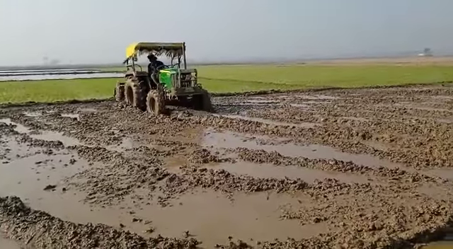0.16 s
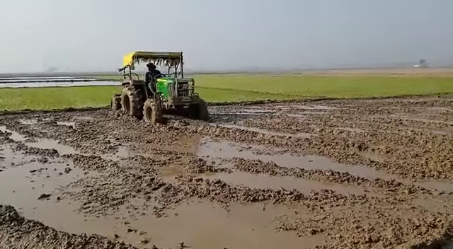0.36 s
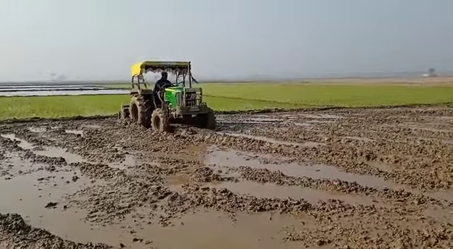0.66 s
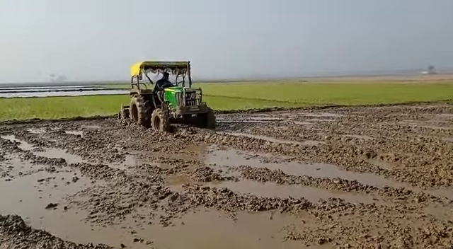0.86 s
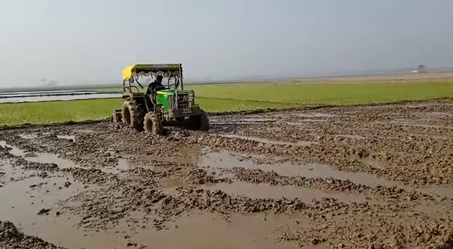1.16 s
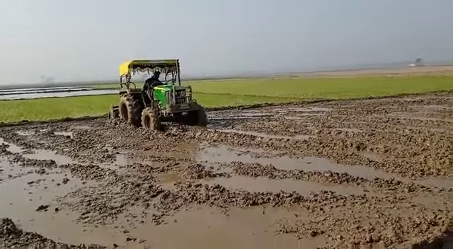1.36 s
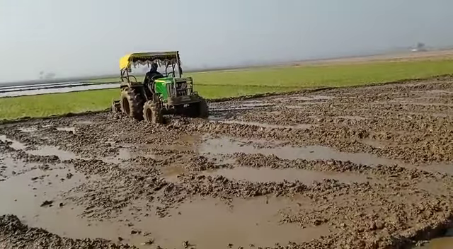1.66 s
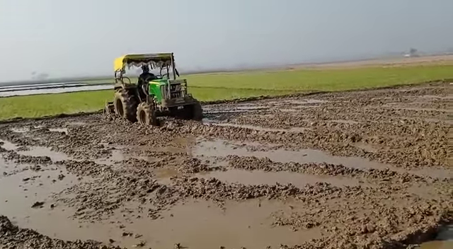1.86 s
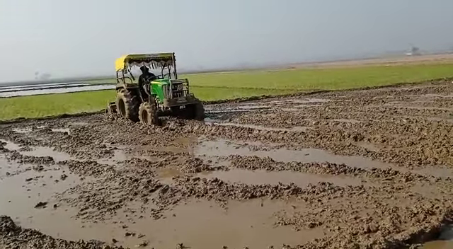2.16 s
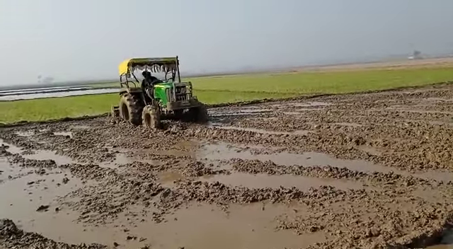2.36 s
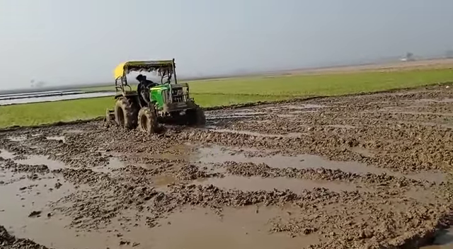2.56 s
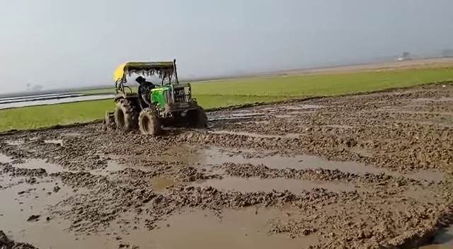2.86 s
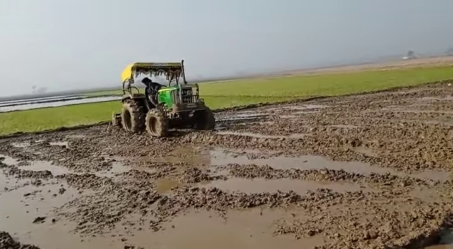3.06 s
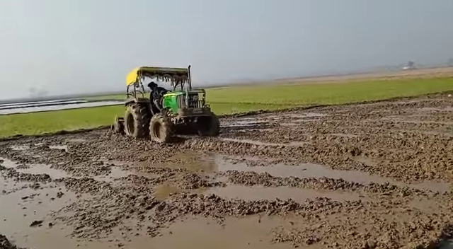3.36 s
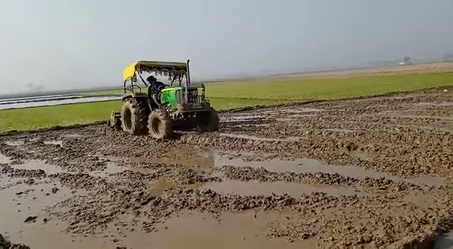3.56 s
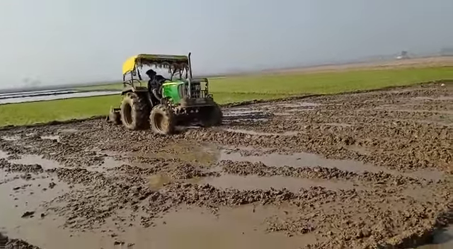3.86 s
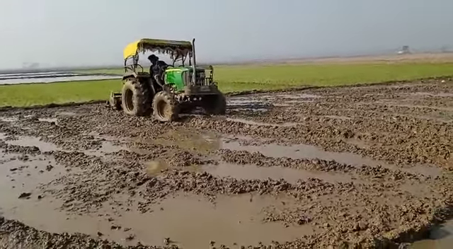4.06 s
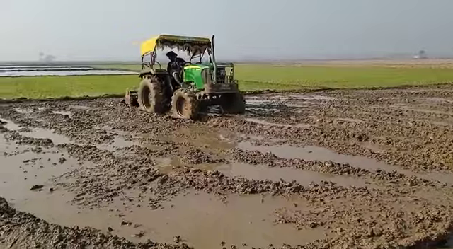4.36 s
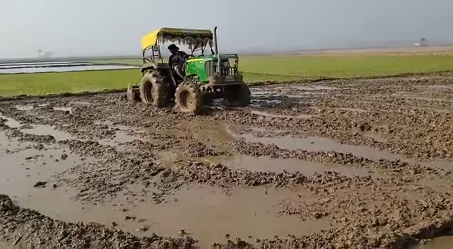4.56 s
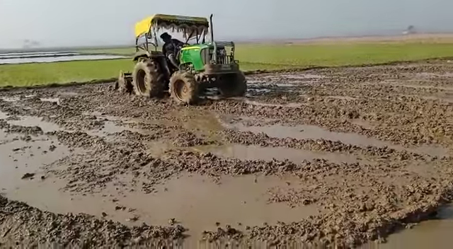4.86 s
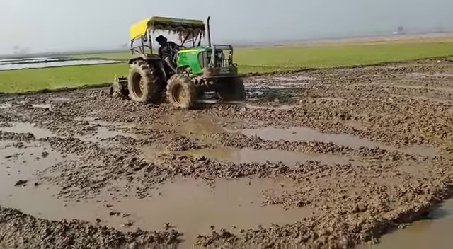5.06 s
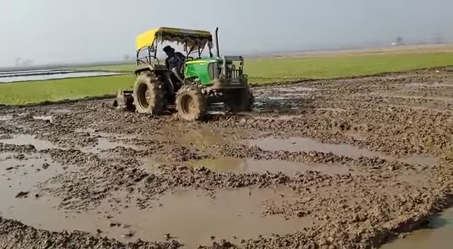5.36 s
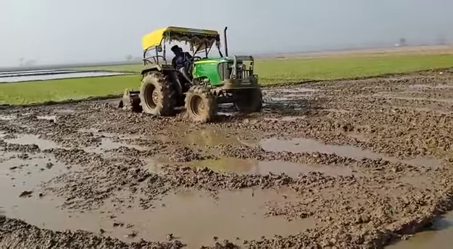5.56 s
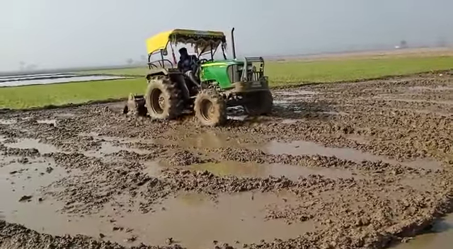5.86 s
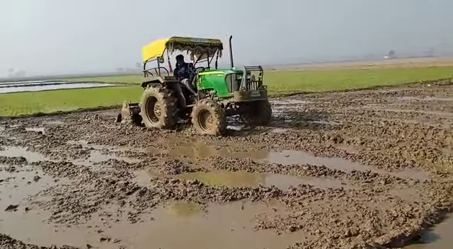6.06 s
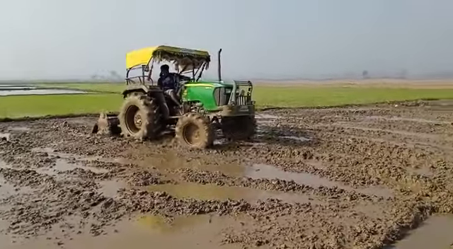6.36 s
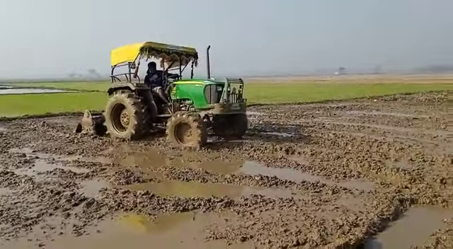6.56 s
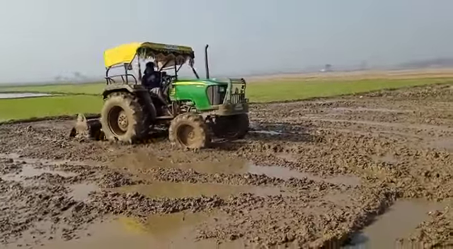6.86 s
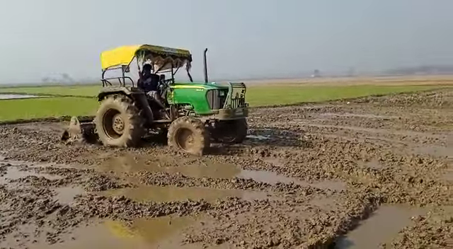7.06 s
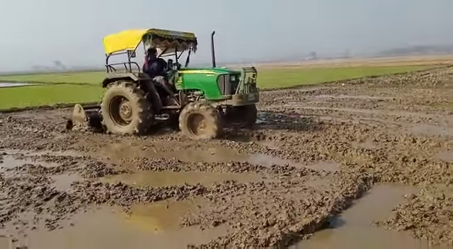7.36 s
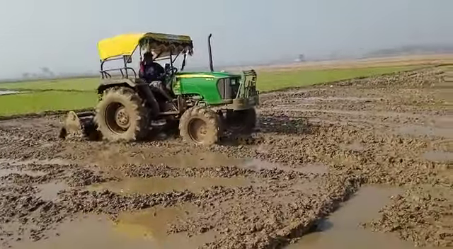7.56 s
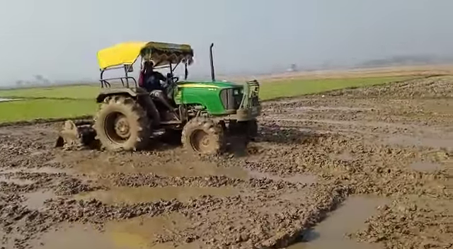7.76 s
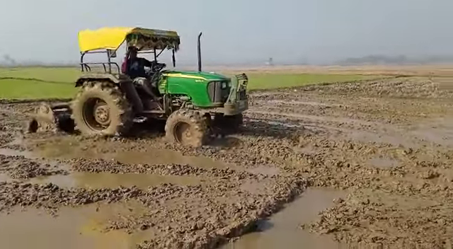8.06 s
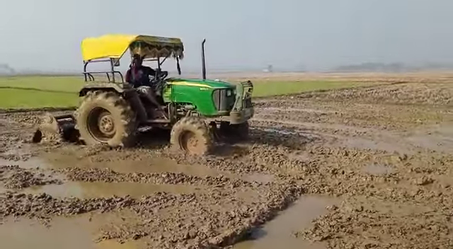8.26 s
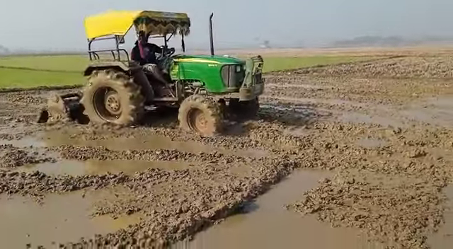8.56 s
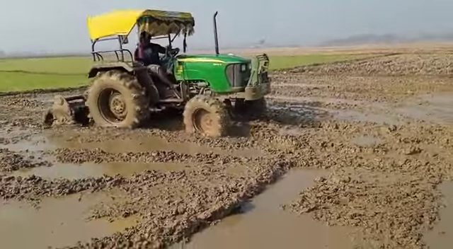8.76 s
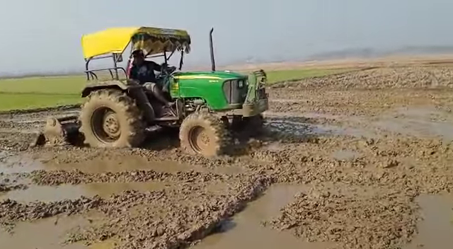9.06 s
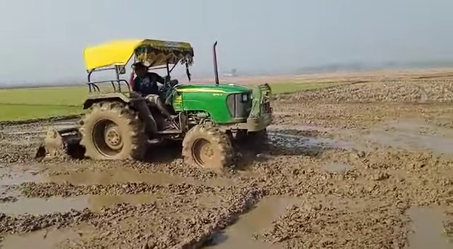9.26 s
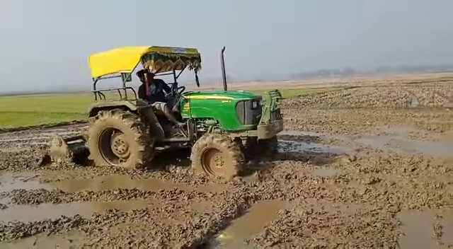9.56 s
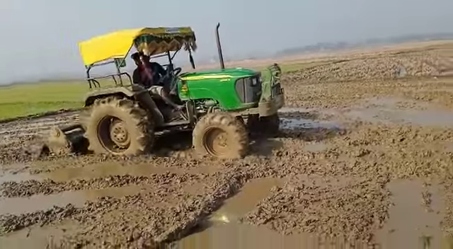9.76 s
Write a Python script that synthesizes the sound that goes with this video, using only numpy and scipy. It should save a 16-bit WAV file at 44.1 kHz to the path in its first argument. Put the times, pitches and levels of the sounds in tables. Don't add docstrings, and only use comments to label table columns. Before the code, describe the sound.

Low exhaust puffs and rattling metal from a three-cylinder tractor, mono and outdoors with no room echo, only a slight hollow colouring from the wet ground. Light running first, a short muddy scrape, then a surge of load drops the revs and brings ringing knocks. After several seconds of labouring it speeds up again and continues steadily, nearer to the phone, over faint low mud churn.

```python
import sys
import numpy as np
from scipy import signal
from scipy.fft import rfft, irfft, next_fast_len
from scipy.io import wavfile
from scipy.ndimage import uniform_filter1d, map_coordinates

SR = 44100
rng = np.random.default_rng(int(sys.argv[2]) if len(sys.argv) > 2 else 0)


def gain_from_decibels(decibels):
    exponent = np.asarray(decibels, float) / 20
    return 10 ** exponent


def materialize(psi):
    bounded = np.clip(np.atleast_2d(psi).T, -1, 1)
    quanta = np.round(bounded * 32767).astype(np.int16)
    wavfile.write(sys.argv[1], SR, quanta)


N = 437472

# (time [s], firing rate [1/s])
FIRING_RATE = [(0.0, 38.5), (1.3, 38.93), (1.45, 37.39), (2.2, 38.34), (2.4, 34.43), (2.8, 29.92),
               (3.65, 28.96), (4.05, 29.6), (4.5, 31.79), (4.9, 29.84), (5.0, 29.77), (5.8, 33.41),
               (6.3, 37.34), (6.75, 36.51), (7.0, 37.44), (7.35, 36.4), (8.0, 36.73), (9.92, 36.77)]
# (time [s], throttle as exhaust level [dB], knock [0-1])
EFFORT = [(0, -38.5, 0.24), (.25, -46.5, 0.04), (.7, -44.5, 0.18), (1.32, -47.5, .2), (1.44, -40.5, 0.17),
          (1.62, -34, 0.42), (1.8, -37.5, 0.15), (2.33, -40, 0), (2.42, -34, 0.78), (2.7, -39, 0.93),
          (3.4, -42.5, 0.67), (4.3, -39.5, 0.75), (4.95, -42.5, 0.62), (5.9, -37, 0.74), (6.4, -38, 0.33),
          (7.7, -38.5, 0.33), (8.9, -39.5, 0.22), (9.92, -36.5, 0.48)]
KNOCK_AT, PUFF_AT, TICK_AT = .62, .44, .28
# (level at usual throttle and 10 m [dB], [dB per throttle dB], [dB per nearness dB], at full knock [dB])
CASING_PART = (-44, 0.41, 1.0443, 3)
BLOCK_PART = (-38, 0.37, 0.66, 1)


def unit(x):
    return x / np.sqrt(np.mean(x ** 2) + 1e-20)


def steady(x, seconds=.4):
    return x / np.sqrt(np.abs(uniform_filter1d(x ** 2, int(seconds * SR))) + 1e-12)


def curves(rows):
    s, *cols = np.transpose(rows)
    return [np.interp(np.arange(N) / SR, s, c) for c in cols]


def wobble(rate):
    coarse = np.arange(0, N + 64, 64)
    knots = rng.standard_normal(int(N * rate / SR) + 4)
    return np.interp(np.arange(N), coarse, map_coordinates(knots, [coarse * rate / SR]))


def colour(x, points, peaks=(), size=16384):
    hz = np.fft.rfftfreq(size, 1 / SR)
    f, v = np.transpose(points)
    level_db = np.interp(np.log(hz + 1), np.log(f + 1), np.maximum(v, -100))
    level_db = level_db + sum(db / (1 + (2 * (hz - c) / w) ** 2) for c, w, db in peaks)
    cepstrum = irfft(np.log(gain_from_decibels(level_db)))
    cepstrum[1:size // 2] *= 2
    cepstrum[size // 2 + 1:] = 0
    return signal.fftconvolve(x, irfft(np.exp(rfft(cepstrum))))[:N]


def levels(part):
    # (time [s], distance [m])
    approach = [(0, 23), (2.3, 20.5), (5, 14.4), (6.1, 12), (8, 8.76), (9.92, 8.65)]
    usual_throttle_db, usual_m = -40, 10
    throttle_db, knock = curves(EFFORT)
    near_db = 20 * np.log10(usual_m / curves(approach)[0])
    level_db, per_throttle, per_near, knock_db = part
    return level_db + per_throttle * (throttle_db - usual_throttle_db) + per_near * near_db + knock_db * knock


def firings(at, column, scatter_db, jitter_ms=0):
    # (knock [dB], exhaust [dB], lateness [ms])
    cylinders = [(-1.5, 3, 0.029), (0, 4, 0.33), (-2, 2.5, -.2)]
    turns = np.cumsum(curves(FIRING_RATE)[0]) / SR - at
    when = np.flatnonzero(np.diff(np.floor(turns)) > 0)
    cylinder = np.array(cylinders)[np.floor(turns[when + 1]).astype(int) % len(cylinders)]
    size, jitter = rng.standard_normal((N // 1000, 2))[:len(when)].T
    late = ((cylinder[:, 2] + jitter_ms * jitter) * SR / 1000).astype(int)
    train = np.zeros(N)
    train[np.clip(when + late, 0, N - 1)] = gain_from_decibels(cylinder[:, column] + scatter_db * size)
    return train


def bursts(train, rise, fall, echo, lag):
    t = np.arange(SR // 20) / SR

    def blow(u):
        return np.maximum(u, 0) / rise * np.exp(-np.maximum(u, 0) / rise)

    tail = 0.31 * np.exp(-t / fall) * (t > rise)
    return unit(signal.fftconvolve(train, blow(t) + echo * blow(t - lag) + tail)[:N])


def ground(x, strength):
    # (time [s], extra delay [ms])
    mirror_path = [(0, 1.31), (4, 1.3), (6, 1.297), (7.6, 1.39), (8.2, 1.28), (9.92, 1.3)]
    late = np.arange(N) - curves(mirror_path)[0] * SR / 1000
    return x + strength * map_coordinates(uniform_filter1d(x, size=6), [late], order=1)


def rings(rows, rise, rough, size=1400):
    s, db, hz, t60 = np.transpose(rows)[:, :, None]
    t = np.arange(size) / SR
    grain = rng.standard_normal((len(s), size))
    ragged = 1 + rough * unit(uniform_filter1d(uniform_filter1d(grain, size=30), size=24))
    envelope = gain_from_decibels(db - 60 * t / t60) * (1 - np.exp(-t / rise)) ** 2 * ragged
    waves = envelope * np.sin(2 * np.pi * hz * t)
    at = np.maximum(np.round(s * SR), 0).astype(int) + np.arange(size)
    return np.bincount(at.ravel(), waves.ravel(), N + size)[:N]


def exhaust():
    # (frequency [Hz], gain [dB])
    pipe = [(25, -82), (40, -76), (58, -11), (73, 0), (110, 1.5), (150, 2), (185, -4.5), (220, -14),
            (300, -25.5), (500, -29), (1000, -52), (4000, -100)]
    # (frequency [Hz], density [dB per Hz])
    mud = [(32, -27), (55, -13.5), (86, -16), (162, -1.5), (199, -5.5), (238, -12), (420, -19),
           (550, -44.5), (920, -120)]
    # (frequency [Hz], density [dB per Hz])
    cab = [(150, -63), (169, -8.5), (178, -4.5), (187, -6.5), (212, -62)]
    boom_part, cab_part, fifth_part = (0, -0.4, 1, 9), (-4.5, -0.4, 1.7, -5), (-5, -0.73, -1, -0.5)
    pipe_ms_per_hz, pipe_mid_hz = 0.203, 111.1
    throttle_db = curves(EFFORT)[0]

    puffs = steady(colour(firings(PUFF_AT, column=1, scatter_db=1.3, jitter_ms=0.18), pipe))
    hz = np.minimum(np.fft.rfftfreq(N, 1 / SR), 240) - pipe_mid_hz
    puffs = irfft(rfft(puffs) * np.exp(-1j * np.pi * pipe_ms_per_hz / 1000 * hz ** 2), N)

    def order(band_hz):
        return signal.sosfiltfilt(signal.butter(2, band_hz, "bandpass", fs=SR, output="sos"), puffs)

    deep = signal.filtfilt(*signal.butter(2, 105, fs=SR), puffs)
    fourth, fifth = order((134, 173)), order((169, 217))
    idle_dip = 0.52 * np.clip((-42 - throttle_db) / 2, 0, 1)
    sung = (gain_from_decibels(levels(fifth_part)) - 1) * fifth
    boomed = (gain_from_decibels(levels(boom_part)) - 1) * deep
    puffs = puffs + sung + boomed - idle_dip * fourth

    churn = unit(colour(rng.standard_normal(N), mud)) * gain_from_decibels(1.0 * wobble(2.0) + 3.4 * wobble(12))
    drone = unit(colour(rng.standard_normal(N), cab)) * gain_from_decibels(levels(cab_part) + 1.4 * wobble(9.1))
    mounts = gain_from_decibels(-71) * np.sin(2 * np.pi * np.cumsum(curves(FIRING_RATE)[0]) / SR)
    return gain_from_decibels(throttle_db + 0.41 * wobble(5)) * (0.93 * puffs + 0.27 * churn + drone) + mounts


def block():
    # (frequency [Hz], density [dB per Hz])
    casing = [(140, -31.5), (230, 2), (408, 0.5), (817, -3.5), (1120, -2), (1700, -11), (1880, -3),
              (2100, -8), (2730, -39.5), (4620, -120)]
    metal = [(1000, -42), (1700, -7.5), (1890, -13.5), (2120, -6), (2460, -4.5), (2860, 1.5), (4050, -5),
             (4510, -3), (5080, -12), (5800, -16.5), (7540, -44), (12800, -120)]
    hiss = [(2820, -33), (4800, 0), (5090, -3.5), (7020, -10), (8490, -21.5), (9790, -21.5), (11500, -33.5),
            (15000, -53), (22000, -120)]
    air = [(4820, -31), (8200, -5.5), (9960, -2), (11400, -5.5), (12100, -9), (12700, -15), (13700, -16),
           (15100, 3.5), (15800, -2)]
    # (frequency [Hz], width [Hz], height [dB])
    panels = [(350, 62, 7), (770, 67, 1.5), (1277, 160, 4.5), (2150, 72, 2.5), (2910, 40, 4),
              (3600, 270, 7), (4165, 140, 7), (4310, 47, 6.5)]
    hiss_part, fan_part = (-50.5, 0.22, 1.41, 5.5), (-63, 0.2, 1, 3)
    strain = np.clip(0.89 * curves(EFFORT)[1], 0, 1)
    knocks = firings(KNOCK_AT, column=0, scatter_db=1.84)
    valve_train = firings(TICK_AT, column=1, scatter_db=5)
    ticks = bursts(valve_train, rise=0.00038, fall=0.0076, echo=0.13, lag=0.0028)

    def layer(spectrum, part, bite, tick, rise, fall):
        share = np.clip(strain * bite, 0, .97)
        gate = np.sqrt(share) * bursts(knocks, rise, fall, echo=0.75, lag=0.0056)
        gate = gate + tick * (1 - strain) * ticks
        noise = rng.standard_normal((2, N))
        rattle = gain_from_decibels(1.17 * wobble(25) + 1.7 * wobble(70))
        mixed = gate * noise[0] + np.sqrt(1 - share) * rattle * noise[1]
        return gain_from_decibels(levels(part)) * steady(ground(colour(mixed, spectrum, panels), strength=.55))

    return (layer(casing, CASING_PART, bite=0.63, tick=0.13, rise=0.0016, fall=0.039)
            + layer(metal, BLOCK_PART, bite=0.57, tick=0.1, rise=0.0016, fall=0.022)
            + layer(hiss, hiss_part, bite=1.11, tick=0.23, rise=0.0025, fall=0.0062)
            + layer(air, fan_part, bite=0.86, tick=0.14, rise=0.0018, fall=0.008))


def pings():
    # (pitch ratio, level [dB], delay [ms])
    head_modes = [(1, 5.5, 0), (.85, 2, 4.5), (.7, -1.5, 5), (1.14, -1.5, 1.5), (1.3, -15.5, 1.5),
                  (2, -19.5, 1.5)]
    # (time [s], peak level [dB], ring frequency [Hz])
    hard_knocks = [(2.484, -22, 3660), (2.5766, -19, 4090), (2.6075, -24, 4180), (2.702, -28, 3600),
                   (2.7355, -27, 4280), (2.7669, -23.5, 3490), (2.8357, -25, 4150), (2.8682, -27, 3570),
                   (3.0694, -18, 4120), (3.171, -18, 4030), (3.2398, -24, 4060), (3.2743, -24, 4080),
                   (3.3411, -22, 4020), (3.443, -19.5, 4060), (3.547, -27.5, 4100), (3.5825, -21.5, 4000),
                   (3.721, -26, 3850), (3.7547, -24.5, 4000), (3.8906, -19.5, 4420), (4.5786, -26, 4330),
                   (5.1717, -22, 4260), (5.364, -24, 4030), (5.4907, -25, 3500), (5.5231, -25, 3560),
                   (5.6154, -23.5, 4010), (5.7062, -28, 4470), (5.8284, -26, 4070), (5.9167, -23, 3800),
                   (6.142, -25, 3350), (6.8193, -21.5, 4130)]
    head_part, sump_part = (-7.5, 0.02, -0.15, 16), (-9.5, .6, -.5, 17.5)
    head_t60, sump_t60, hard_t60 = .022, .02, .032
    casing_db, block_db, head_db, sump_db = map(levels, (CASING_PART, BLOCK_PART, head_part, sump_part))
    head_hz = 3653 + 537 * curves(EFFORT)[1]
    blows = firings(KNOCK_AT, column=0, scatter_db=0.5)
    at = np.flatnonzero(blows)
    s, db = at / SR, 20 * np.log10(blows[at])

    def luck():
        return rng.standard_normal(N // 1000)[:len(at)]

    struck = []
    for ratio, level_db, ms in head_modes:
        start = s + (ms + .8 * luck()) / 1000
        ring_db = db + block_db[at] + head_db[at] + 6 + level_db + 1.8 * luck()
        ring_hz = ratio * head_hz[at] * (1 + .045 * luck())
        struck.append(np.c_[start, ring_db, ring_hz, 0 * s + head_t60])

    thud_db = db + casing_db[at] + sump_db[at] + 11 + 1.6 * luck()
    sump = np.c_[s + .002, thud_db, 740 * np.exp(.15 * luck()), 0 * s + sump_t60]

    loose = rng.random((900, 3))
    when = loose[:, 0] * (N - 1)
    chink_db = block_db[when.astype(int)] - 2 + 11 * loose[:, 1] ** 2
    struck.append(np.c_[when / SR, chink_db, 2500 + 2100 * loose[:, 2], 0 * when + head_t60])

    hard = [(s - .0015, db + 2.0, hz, hard_t60) for s, db, hz in hard_knocks]
    return (rings(np.vstack(struck), rise=0.00092, rough=0.24, size=900)
            + rings(hard, rise=0.00096, rough=0.29)
            + rings(sump, rise=0.00064, rough=0.25, size=900))


def tappets():
    # (frequency [Hz], density [dB per Hz])
    valve_gear = [(6000, -40), (7800, -7), (8500, 1), (9200, -1), (9900, 1), (11200, -5), (12500, -40)]
    train = firings(TICK_AT, column=1, scatter_db=5.5)
    ticks = bursts(train, rise=0.0016, fall=0.015, echo=0.13, lag=0.0028)
    tick_part = (-75, 0.4, -0.5, -0.5)
    return gain_from_decibels(levels(tick_part)) * unit(colour(ticks * rng.standard_normal(N), valve_gear))


def tiller():
    # (time [s], level [dB], decay t60 [s])
    bites = [
        (1.357, -35, .16),
        (1.366, -34, .06),
        (1.385, -42, .2),
        (1.402, -39, .2),
    ]
    # (frequency [Hz], density [dB per Hz])
    scrape = [(160, -25), (280, -0.5), (430, -14), (680, -0.5), (1140, -12), (1340, -10), (1800, -16.5),
              (2340, -46), (3960, -120)]
    t = np.arange(N) / SR
    shape = sum(gain_from_decibels(db - 60 * np.abs(t - s) / t60) * np.clip((t - s) / 0.0038, 0, 1) for s, db, t60 in bites)
    return shape * unit(colour(rng.standard_normal(N), scrape))


def bumps():
    # (time [s], level [dB], frequency [Hz], decay t60 [s])
    knocks_and_clinks = [
        (.3602, -16.5, 165, .06),
        (.3762, -22, 110, .045),
        (.357, -27, 480, .03),
        (.3565, -29, 800, .03),
        (.368, -33, 900, .04),
        (2.38, -36, 5650, .06),
        (1.375, -44, 5700, .03),
        (1.596, -42, 7300, .03),
        (1.623, -42, 7250, .03),
        (1.702, -48, 7000, .03),
    ]
    return rings(knocks_and_clinks, rise=.002, rough=0.064, size=3000)


def scene():
    return (exhaust() + block() + pings() + tappets() + tiller() + bumps())[None]


def top_cut(x):
    return signal.sosfilt(signal.butter(12, 15930, fs=SR, output="sos"), x)


def record(dry):
    m = next_fast_len(N)
    in_band = np.fft.rfftfreq(m, 1 / SR) < 15750
    heard = irfft(rfft(dry, m) * in_band, m)[:, :N]
    return top_cut(heard)


dry = scene()
out = record(dry)
materialize(out)
```